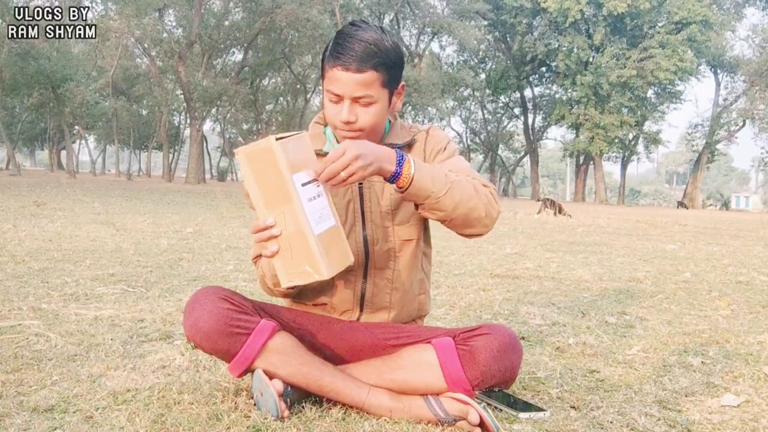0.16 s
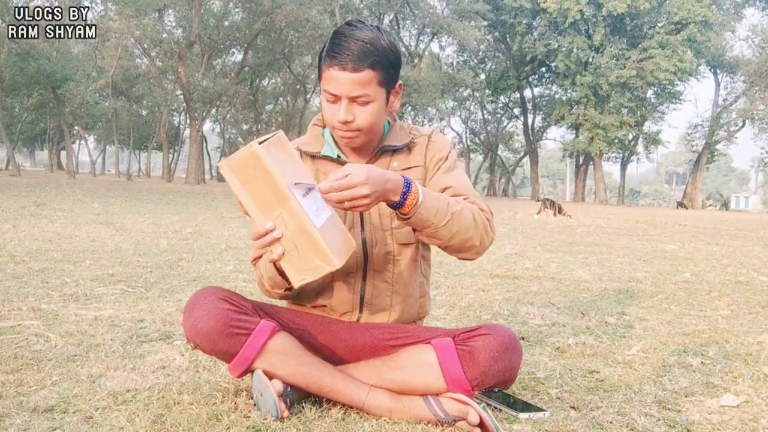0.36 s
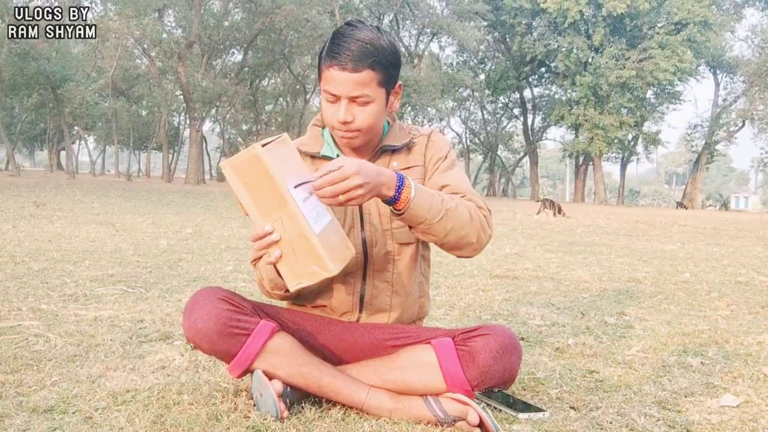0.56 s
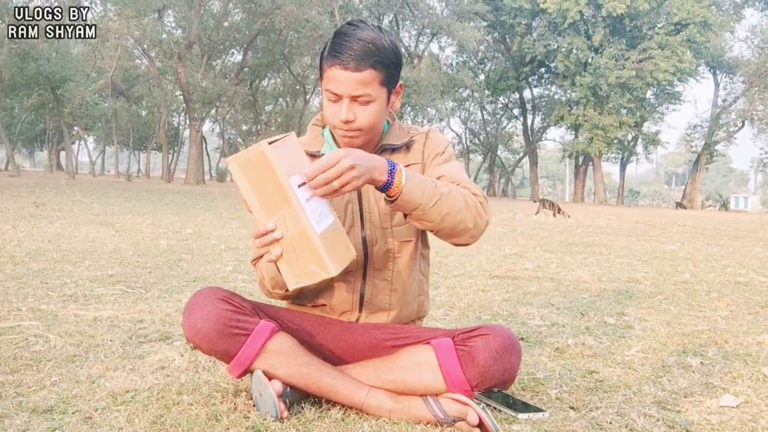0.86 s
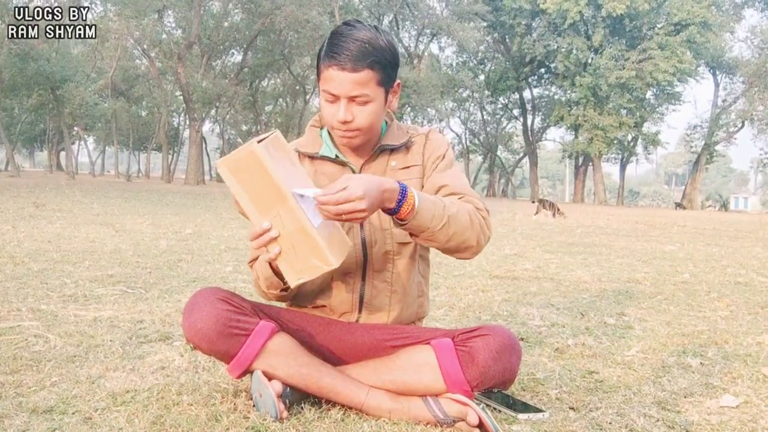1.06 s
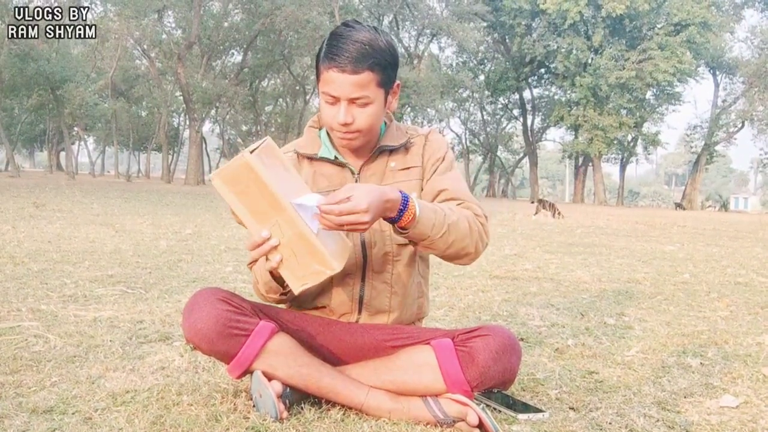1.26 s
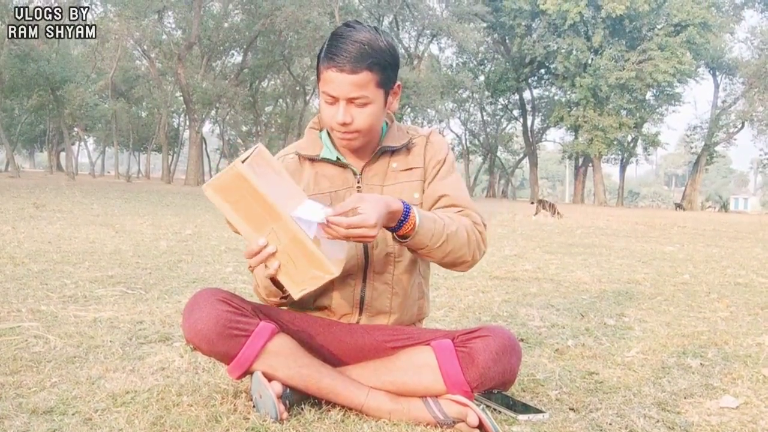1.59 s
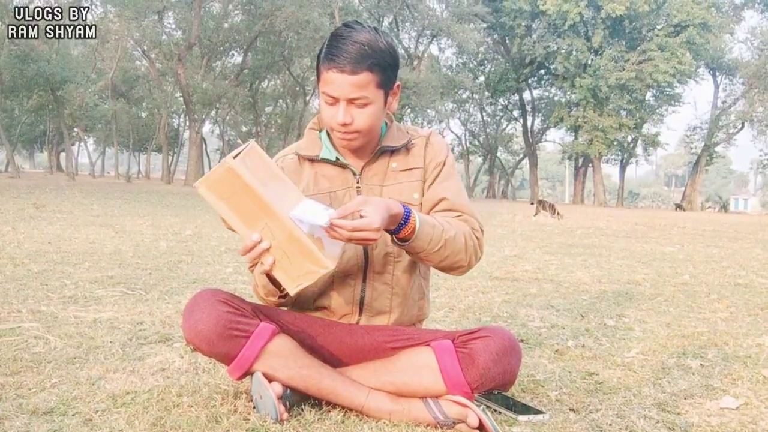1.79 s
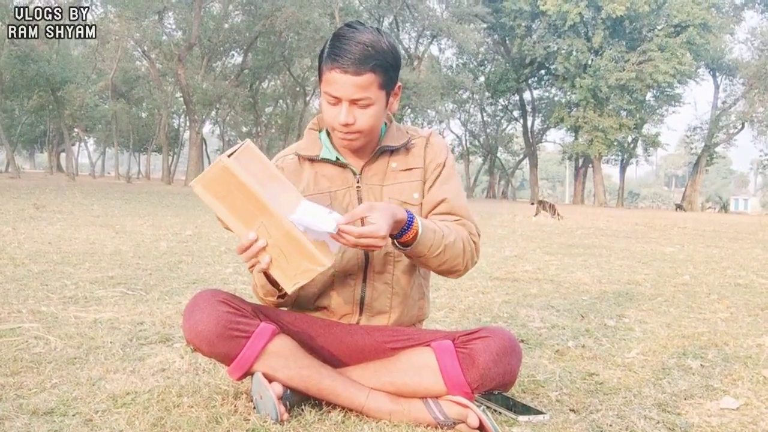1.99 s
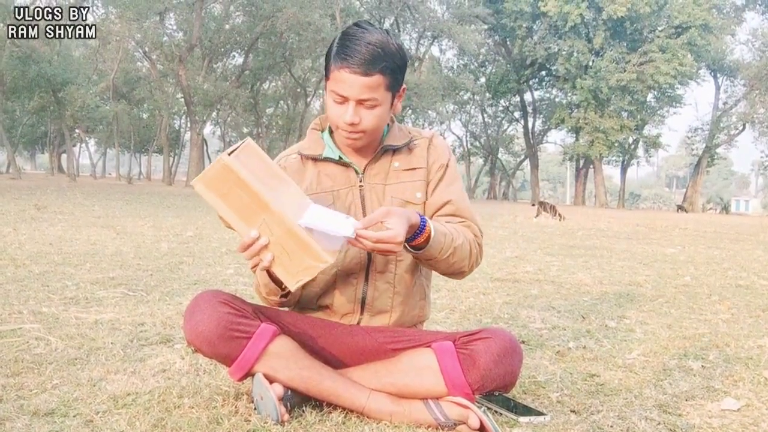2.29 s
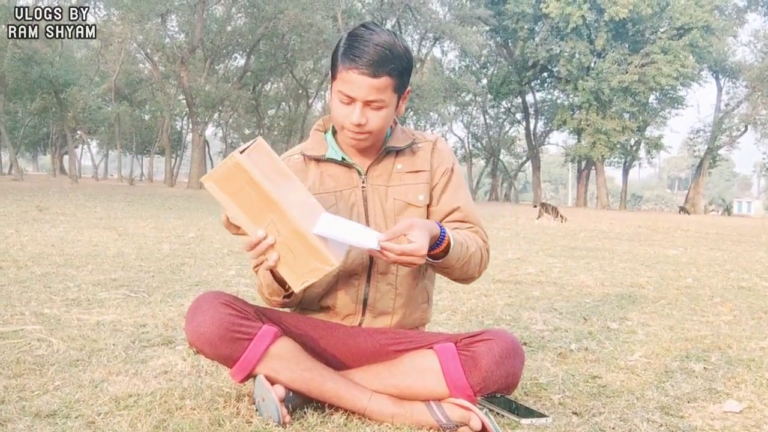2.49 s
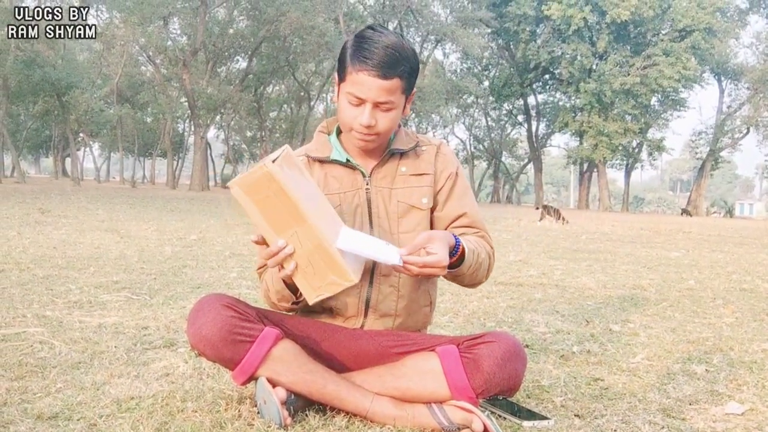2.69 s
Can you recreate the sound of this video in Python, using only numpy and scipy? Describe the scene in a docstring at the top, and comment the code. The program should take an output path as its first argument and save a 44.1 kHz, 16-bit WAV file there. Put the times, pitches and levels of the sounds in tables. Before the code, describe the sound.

Outdoors, a taped label is torn from a cardboard box: one loud rip, then slow, crackly pulls slightly to the left, the last one strongest. The box rustles and pops, and metal tinks lightly over a low hum and soft hiss.

```python
"""Open field: a taped paper label is pulled off a cardboard parcel. One loud rip, then slow short pulls.
Glue lets go in tiny slips and single snaps; the paper scatters each, the hollow box rustles and buckles.
A fingernail picks at the label before the pulls. A bit of metal tinks four times.
A faint low hum and a soft hiss lie underneath."""
import sys
import numpy as np
from scipy import signal
from scipy.fft import rfft, irfft, next_fast_len
from scipy.io import wavfile
from scipy.ndimage import uniform_filter1d, map_coordinates

SR = 44100
rng = np.random.default_rng(int(sys.argv[2]) if len(sys.argv) > 2 else 0)


def write(x):
    x = np.atleast_2d(x).T
    wavfile.write(sys.argv[1], SR, np.round(np.clip(x, -1, 1) * 32767).astype(np.int16))

N = 125685

# open-air hiss (frequency [Hz], gain [dB])
AIR_COLOUR = [(20, 4), (80, 2), (120, -8), (200, -13), (400, -17.5), (1000, -23.5), (1800, -24),
              (2500, -22), (3400, -28.5), (5200, -26), (5750, -20), (6300, -28), (7600, -25.5),
              (9500, -33.5), (14000, -30.5)]
# hiss (frequency [Hz], left-right coherence [0-1])
AIR_COHERENCE = [(100, 0.9), (1200, 0.1)]
AIR_DB, HUM_HZ, HUM_DB, HUM_DRIFT_RAD = -54.5, 57.7, -44.5, 0.14

# first rip, rasp (time [s], level [dB])
RIP_ENVELOPE = [(.228, -76), (.236, -31), (.25, -48), (.261, -26), (.277, -33), (.289, -29), (.295, -24.5),
                (.319, -22.5), (.326, -29), (.342, -41), (.385, -46), (.415, -70)]
# first rip, snaps (time [s], strength [dB])
RIP_SNAPS = [(.2353, 1.5), (.2373, -3), (.2441, -5.5), (.2542, 0), (.2593, -7), (.2632, -8), (.2705, -4),
             (.2838, -3), (.2928, -4), (.298, -5), (.3025, -2), (.3072, -1), (.3171, -1)]
# scattered sound (frequency [Hz], left-right coherence [0-1])
SCATTER_COHERENCE = [(300, 0.95), (1100, 0.8), (4000, 0.041)]
# taut tape (frequency [Hz], gain [dB])
TAPE_COLOUR = [(130, -29.5), (210, 3), (290, -10), (430, 4.5), (620, -1), (880, 7), (1250, 3), (1600, -7),
               (2400, 0), (2950, -4), (3550, 0.5), (3880, -5), (4700, 1.5), (9000, 4), (13500, -3)]
# box wall ringing (frequency [Hz], level [dB], t60 [s])
WALL_MODES = [(210, 10, 0.09), (428, 1, 0.08), (530, -1, 0.08)]
WALL_DB = -12.5
# first rip (frequency [Hz], left over right [dB])
RIP_PAN = [(200, -7), (700, -4.5), (1500, -1.5), (5000, -5), (8000, -2), (12000, -0.5)]

# light knocks on metal, likely a bracelet (time [s], level [dB])
TINKS = [(0.484, -59.5), (0.765, -49.5), (1.285, -51), (2.1527, -44.5)]
# metal ringing (frequency [Hz], level [dB], t60 [s])
METAL_MODES = [(5580, -15.5, 0.5), (9050, 1.5, 0.14), (9940, -7.5, 0.18), (13400, -10, 0.1)]
# fingernail picking (time [s], level [dB])
SCRATCH_ENVELOPE = [(.68, -76), (.699, -53), (.725, -63.5), (.85, -61.5), (.88, -77)]
# nail on paper (frequency [Hz], gain [dB])
NAIL_COLOUR = [(300, -20), (2500, 1), (5000, 0.5), (14000, -10)]

# slack label, one list per pull (time [s], crackle level [dB], box level [dB])
SLACK_PULLS = [
    [(1.02, -74, -88), (1.045, -60.5, -83), (1.08, -63.5, -64), (1.115, -51, -54), (1.16, -47, -48),
     (1.205, -52.5, -52.5), (1.25, -51, -49.5), (1.28, -60, -68), (1.302, -61, -56.5), (1.33, -78, -91)],
    [(1.48, -65, -68), (1.5, -60.5, -63), (1.535, -62.5, -55.5), (1.575, -59.5, -59.5), (1.605, -72, -71),
     (1.64, -63.5, -60), (1.725, -53.5, -48), (1.756, -42.5, -45), (1.775, -54, -55.5), (1.805, -62, -69)],
    [(1.825, -60.5, -67), (1.865, -53.5, -56.5), (1.925, -52, -54), (1.99, -46.5, -47), (2.015, -47, -49),
     (2.05, -65, -55.5), (2.07, -90, -78), (2.135, -48.5, -53), (2.165, -55.5, -57.5), (2.22, -63, -69)],
    [(2.275, -62, -58), (2.32, -62, -58), (2.345, -40, -51), (2.378, -44, -50), (2.405, -45, -56),
     (2.42, -54, -56), (2.46, -55, -65)],
]
# slack label, snaps (time [s], strength [dB])
SLACK_SNAPS = [(.6955, -28), (1.0405, -31), (1.059, -28.5), (1.0959, -22.5), (1.525, -24), (1.7444, -13),
               (1.7518, -8.5), (1.9657, -24), (1.9846, -10.5), (2.0459, -22.5), (2.0885, -20.5),
               (2.1019, -12.5), (2.1147, -13), (2.1264, -20), (2.1338, -15), (2.29, -12.5), (2.3102, -14.5),
               (2.3236, -14), (2.331, -9.5), (2.3357, -11), (2.3463, -13), (2.3516, -10.5), (2.3658, -8.5),
               (2.3668, -8), (2.394, -13.5), (2.4036, -13.5), (2.4104, -15.5), (2.4326, -18)]
# slack label (frequency [Hz], gain [dB])
SLACK_COLOUR = [(80, -30), (300, 0), (650, -13.5), (950, 1), (1350, -2.5), (2400, -2), (3100, 1.5),
                (3700, -0.5), (5200, 2.5), (5800, 5.5), (9000, 3), (13500, 0)]
# taut label, last pull (time [s], crackle level [dB], box level [dB])
TAUT_PULL = [(2.47, -55, -63), (2.51, -52, -56), (2.532, -40, -55), (2.539, -32.5, -52), (2.553, -35, -51),
             (2.562, -32, -43), (2.577, -36.5, -47.5), (2.586, -33, -40), (2.598, -56, -68),
             (2.64, -71, -75)]
# taut label, snaps (time [s], strength [dB])
TAUT_SNAPS = [(2.4847, -15), (2.5027, -13.5), (2.5156, -13.5), (2.549, -13), (2.5555, -7.5), (2.5587, -5.5),
              (2.5612, -11), (2.5633, -12), (2.585, -11)]
# taut label (frequency [Hz], gain [dB])
TAUT_COLOUR = [(200, -9), (620, -15), (930, -1.5), (1250, -8.5), (1600, 0), (2380, -8.5), (2650, 2),
               (3250, 3.5), (3600, -6), (4680, 4), (5100, -0.5), (6500, 4), (13500, 0)]
# peeling label (frequency [Hz], left over right [dB])
PEEL_PAN = [(300, 1), (1200, 8), (3500, 1.5), (7000, 4)]

# hollow box (frequency [Hz], gain [dB])
BOX_COLOUR = [(50, -4), (110, -21), (180, -3), (240, -4.5), (330, 4.5), (420, -6.5), (600, -16), (950, -7),
              (1400, -12), (2500, -18), (6000, -45)]
# cardboard pops (time [s], strength [dB], pitch [Hz])
BUCKLES = [(1.5261, -22, 1770), (1.837, -32, 736), (2.291, -27, 1340), (2.586, -16.5, 940)]
BUCKLE_HALF_WIDTH_OCT = 0.42

# left microphone port (frequency [Hz], gain [dB])
LEFT_PORT = [(1000, -1), (2500, 2), (5000, 4.5), (6900, 7), (7650, 11.5), (8400, 10), (9200, 0),
             (10500, -0.5), (14000, -1.5), (15000, -20), (16500, -34.5)]
# right microphone port (frequency [Hz], gain [dB])
RIGHT_PORT = [(1000, -1.5), (5000, 0), (6900, -3.5), (8200, 4), (9500, -1.5), (14000, -1), (15000, -34),
              (16500, -27.5)]
RIGHT_LAG_S, GROUND_DELAY_S, GROUND_DB = 4.8e-5, .0019, -18.5
TOP_HZ = 16500


def amp(db):
    """Decibels to gain."""
    return 10 ** (np.asarray(db) / 20)


def unit_rms(x):
    """Scale to rms 1."""
    return x / np.sqrt(np.mean(x ** 2) + 1e-20)


def fft_len():
    """N plus room for tails."""
    return 2 * next_fast_len(N // 2 + SR // 16, real=True)


def bins_hz():
    """FFT bin frequencies."""
    return np.fft.rfftfreq(fft_len(), 1 / SR)


def curve(points):
    """(frequency [Hz], value) points, interpolated to the bins on a log axis."""
    hz, values = np.transpose(points)
    return np.interp(np.log(bins_hz() + 1), np.log(hz + 1), values)


def filtered(x, response):
    """Apply a per-bin response."""
    return irfft(rfft(x, fft_len()) * response)[..., :N]


def min_phase(colour):
    """Causal response from (frequency [Hz], gain [dB]) points."""
    cepstrum = irfft(np.log(amp(curve(colour))))
    half = len(cepstrum) // 2
    cepstrum[1:half] *= 2
    cepstrum[half + 1:] = 0
    return np.exp(rfft(cepstrum))


def coloured(x, colour):
    """Filter with unit mean power gain below TOP_HZ."""
    response = min_phase(colour)
    power = np.mean(abs(response[bins_hz() < TOP_HZ]) ** 2)
    return filtered(x, response / np.sqrt(power))


def panned(x, pan):
    """Left-right balance per band."""
    half_db = curve(pan) / 2
    return filtered(x, amp(np.array([half_db, -half_db])))


def envelope(rows, column=1):
    """Gain from a dB column of a timed table, silent outside it."""
    cols = np.transpose(rows)
    return amp(np.interp(np.arange(N) / SR, cols[0], cols[column], left=-np.inf, right=-np.inf))


def wobble(rate_hz):
    """Smooth curve through random knots."""
    knots = rng.standard_normal(int(N * rate_hz / SR) + 4)
    return map_coordinates(knots, [np.arange(N) * rate_hz / SR])


def diffuse(coherence):
    """White stereo noise of given left-right coherence."""
    angle = np.arccos(np.clip(curve(coherence), -1, 1)) / 2
    mid, side = filtered(rng.standard_normal((2, N)), np.array([np.cos(angle), np.sin(angle)]))
    return np.array([mid + side, mid - side])


def background():
    """Slightly wavering low hum plus open-air hiss."""
    phase = 2 * np.pi * HUM_HZ * np.arange(N) / SR + HUM_DRIFT_RAD * wobble(rate_hz=25.0)
    hiss = coloured(diffuse(AIR_COHERENCE), AIR_COLOUR)
    return amp(HUM_DB) * unit_rms(np.sin(phase)) + amp(AIR_DB) * hiss


def stick_slip(rate_hz, jitter_periods, spread_db):
    """Near-periodic slips: a buzzing rasp, rms 1."""
    count = int(N / SR * rate_hz)
    late, size = rng.uniform(-1, 1, (count, 2)).T
    onsets = (np.arange(count) + jitter_periods * late) * SR / rate_hz
    return unit_rms(np.bincount(np.clip(onsets, 0, N - 1).astype(int), amp(spread_db * size), N))


def snaps(rows):
    """One impulse per snap, as when a glue strand breaks."""
    pushes = np.zeros(N)
    for time_s, db in rows:
        pushes[round(time_s * SR)] += amp(db)
    return pushes


def scatter(pushes, t60_s, db):
    """A fresh decaying noise tail behind each push."""
    decay = amp(-60 * np.arange(SR // 2) / SR / t60_s) ** 2
    power = signal.fftconvolve(pushes ** 2, decay / decay.sum())[:N]
    return amp(db) * diffuse(SCATTER_COHERENCE) * np.sqrt(abs(power))


def flexing(x, depth_db):
    """The sheet bends as it lifts: its colour shifts at random."""
    spectra = signal.stft(x, nperseg=128)[2]
    patches = uniform_filter1d(rng.standard_normal(spectra.shape[1:]), size=3, axis=0)
    patches = uniform_filter1d(patches, size=14, axis=1)
    return signal.istft(spectra * amp(depth_db * unit_rms(patches)), nperseg=128)[1][:, :N]


def rip():
    """Taut tape gives way: snaps, and a rasp that rings the box wall."""
    rasp = envelope(RIP_ENVELOPE) * stick_slip(rate_hz=1100, jitter_periods=.7, spread_db=5)
    pushes = snaps(RIP_SNAPS) + rasp
    crack = amp(-2) * pushes + scatter(pushes, t60_s=0.0035, db=-2)
    tails = scatter(pushes, t60_s=0.015, db=-6) + scatter(pushes, t60_s=0.19, db=-17.5)
    tape = flexing(coloured(crack + tails, TAPE_COLOUR), depth_db=2)
    t = np.arange(SR // 3) / SR
    ring = sum(amp(db - 60 * t / t60_s) * np.sin(2 * np.pi * hz * t) for hz, db, t60_s in WALL_MODES)
    wall = signal.fftconvolve(rasp, ring / np.linalg.norm(ring))[:N]
    return panned(tape + amp(WALL_DB) * wall, RIP_PAN)


def tinks():
    """A small metal piece is knocked; its high modes ring down."""
    t = np.arange(SR // 2) / SR
    metal = np.zeros(N + len(t))
    for time_s, db in TINKS:
        for hz, mode_db, t60_s in METAL_MODES:
            decay = amp(db + mode_db + rng.standard_normal() - 60 * t / t60_s)
            metal[round(time_s * SR):][:len(t)] += decay * np.sin(2 * np.pi * hz * t)
    return metal[:N]


def slips(rate_hz, spread_db):
    """Tiny slips, random in time, size and sign; rms 1."""
    hits = rng.random(N) < rate_hz / SR
    sizes = amp(spread_db * (2 * rng.random(N) - 1))
    return unit_rms(hits * sizes * rng.choice([-1, 1], N))


def scratch():
    """A fingernail picks at the label's edge."""
    pushes = envelope(SCRATCH_ENVELOPE) * slips(rate_hz=500, spread_db=4)
    return coloured(scatter(pushes, t60_s=0.0092, db=0), NAIL_COLOUR)


def label(pushes, colour):
    """Paper scatters and colours each slip, left of centre."""
    crack = amp(-3.5) * pushes + scatter(pushes, t60_s=0.009, db=-4)
    tails = scatter(pushes, t60_s=0.019, db=-8.0) + scatter(pushes, t60_s=0.31, db=-20.5)
    sheet = flexing(coloured(crack + tails, colour), depth_db=2.5)
    return panned(sheet, PEEL_PAN)


def peel():
    """Glue fails: crackling pulls with the label slack, then one buzzing pull with it taut."""
    crackle = sum(envelope(pull) for pull in SLACK_PULLS) * slips(rate_hz=1800, spread_db=6)
    buzz = envelope(TAUT_PULL) * stick_slip(rate_hz=520, jitter_periods=.35, spread_db=3)
    slack = label(snaps(SLACK_SNAPS) + crackle, SLACK_COLOUR)
    taut = label(snaps(TAUT_SNAPS) + buzz, TAUT_COLOUR)
    return slack + taut


def box():
    """The cardboard wall gives a hollow rustle on each pull."""
    pulling = sum(envelope(pull, column=2) for pull in SLACK_PULLS + [TAUT_PULL])
    pushes = pulling * slips(rate_hz=1600, spread_db=7.5)
    return coloured(scatter(pushes, t60_s=0.015, db=2.5), BOX_COLOUR)


def buckles():
    """Cardboard buckles under the fingers: dull pops, each around its own pitch."""
    edge = 2 ** BUCKLE_HALF_WIDTH_OCT
    pops = np.zeros(N)
    for time_s, db, hz in BUCKLES:
        band = [(hz / 8, -36), (hz / edge, 0), (hz * edge, 0), (hz * 8, -45)]
        pops += coloured(snaps([(time_s, db)]), band)
    return pops


def scene():
    """Parcel sound, left side first, with one ground reflection; tinks and background on top."""
    left_lead = np.exp(1j * np.pi * RIGHT_LAG_S * np.outer([1, -1], bins_hz()))
    ground = 1 + amp(GROUND_DB) * np.exp(-2j * np.pi * GROUND_DELAY_S * bins_hz())
    parcel = rip() + scratch() + peel() + box() + buckles()
    return filtered(parcel, left_lead * ground) + tinks() + background()


def record(dry):
    """Each port has its own treble resonance; hard cut at TOP_HZ."""
    ports = np.array([min_phase(LEFT_PORT), min_phase(RIGHT_PORT)])
    return filtered(dry, ports * (bins_hz() < TOP_HZ))


dry = scene()
out = record(dry)
write(out)
```